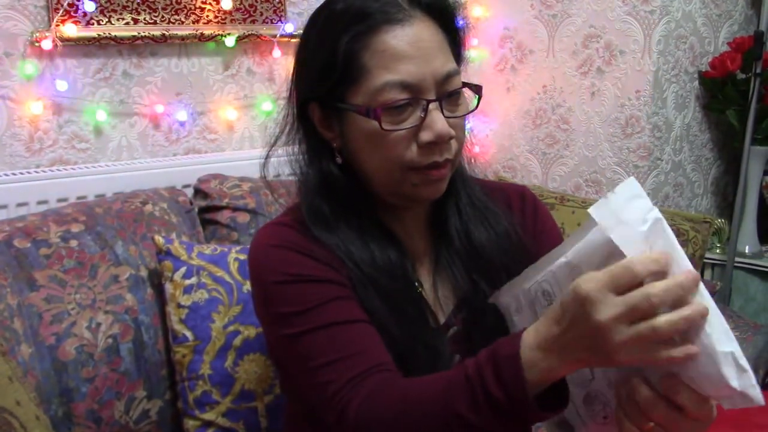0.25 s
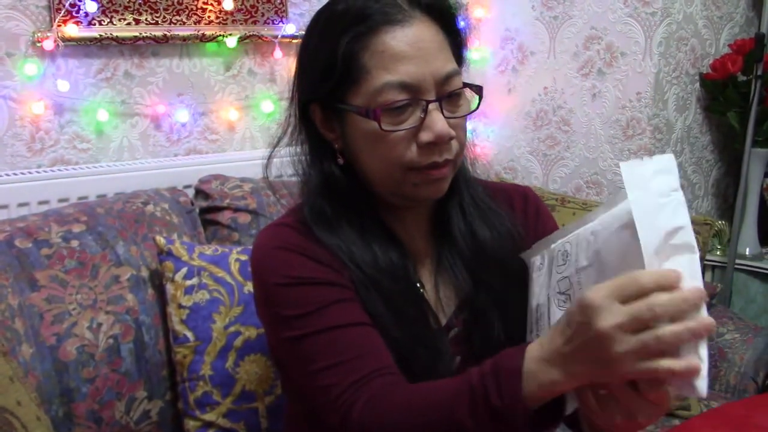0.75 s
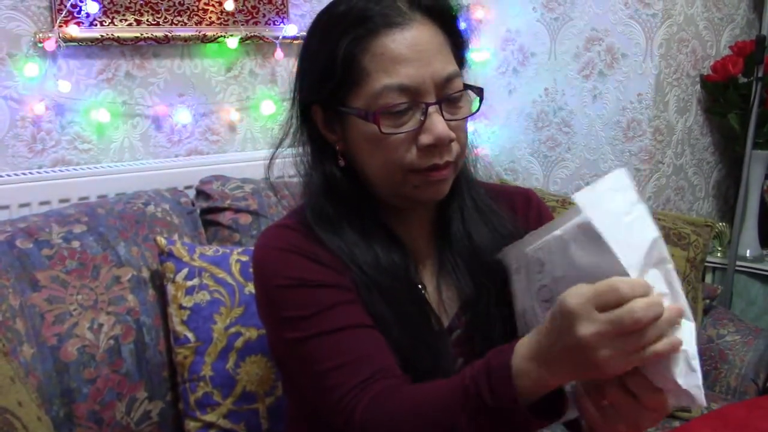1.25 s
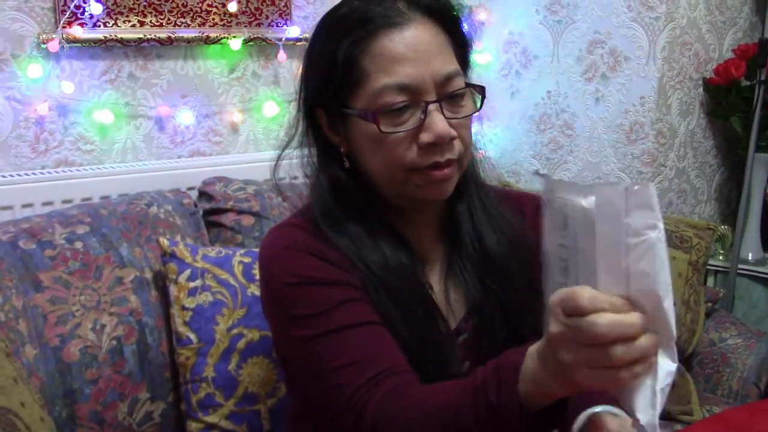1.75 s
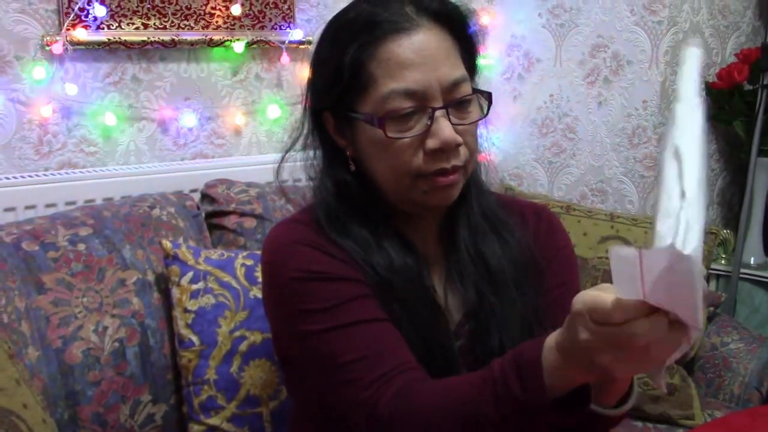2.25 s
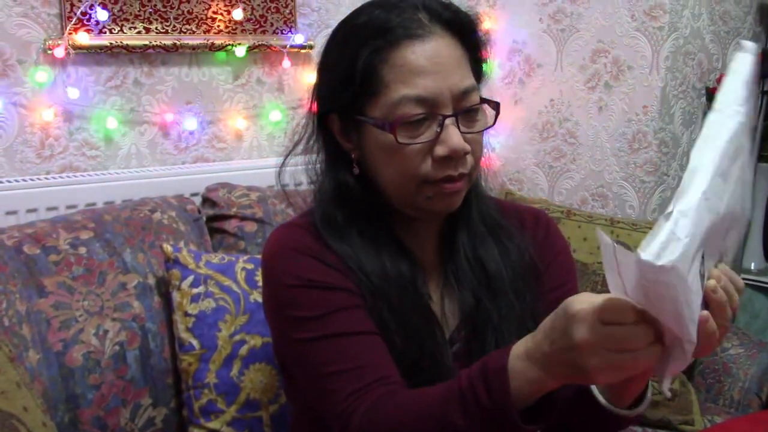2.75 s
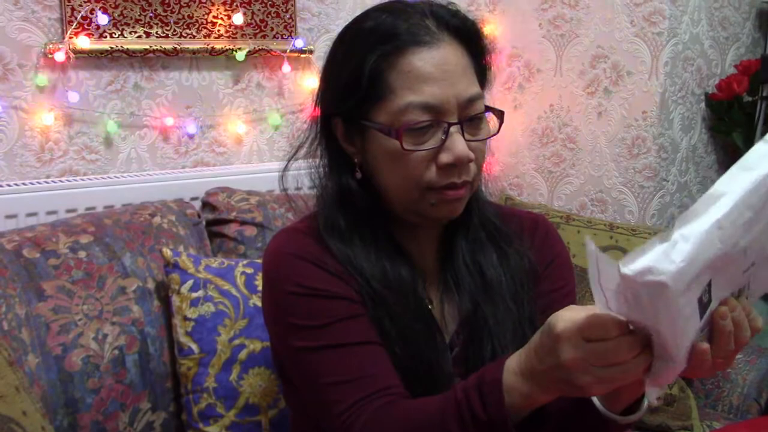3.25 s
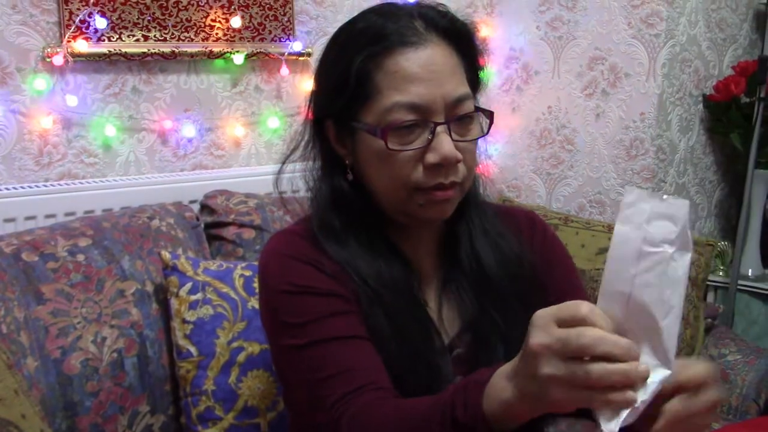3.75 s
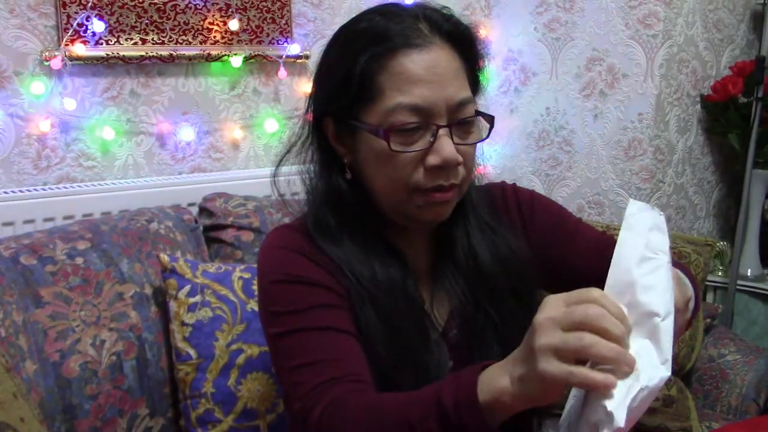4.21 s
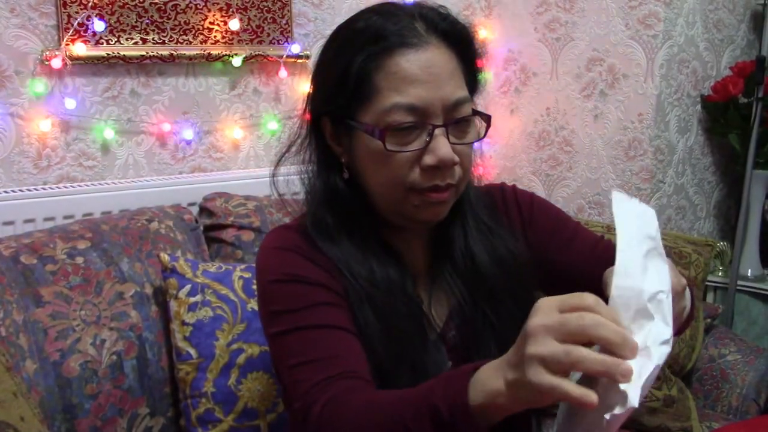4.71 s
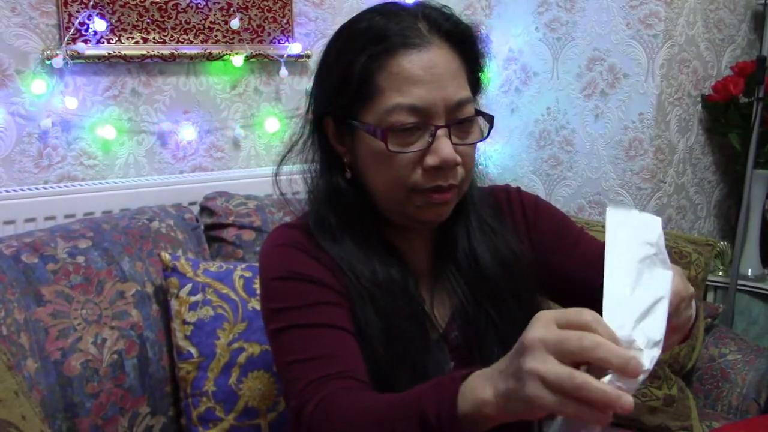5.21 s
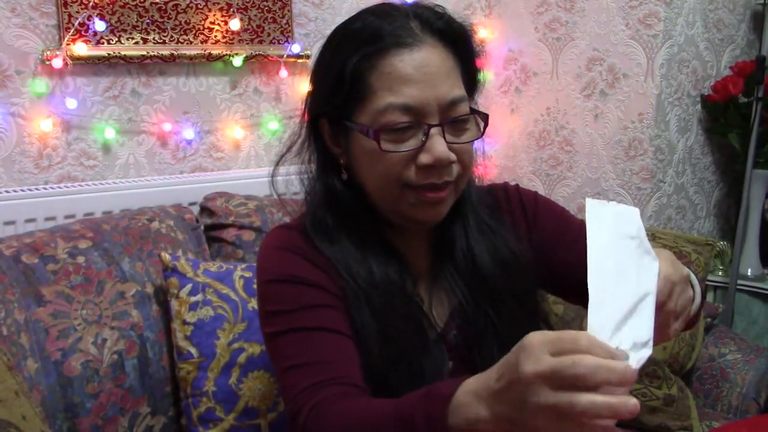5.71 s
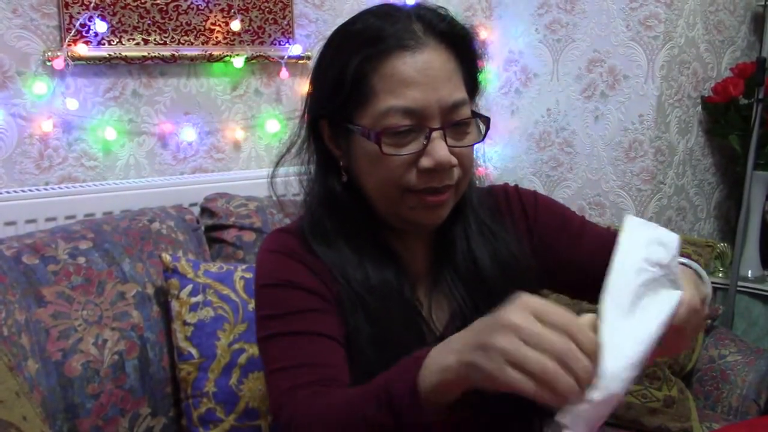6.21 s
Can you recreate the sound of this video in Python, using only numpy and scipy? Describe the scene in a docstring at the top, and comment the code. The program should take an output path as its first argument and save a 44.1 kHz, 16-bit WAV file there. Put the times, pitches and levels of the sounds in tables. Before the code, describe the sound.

Hands turn, bend and tug at a stiff paper envelope in a small soft room, dry crackles growing into sharp ripping bursts.

```python
"""A paper mailing envelope is turned, bent and pulled open by hand: swarms of tiny creases crinkle as filtered
noise grains, bigger ones buckle as single ringing snaps, hard tugs crumple and rip the flap in swelling
avalanches, and the pouch thumps dully as a decaying sine. Place: a small, soft living room with a short tail.
Distance: a metre. Microphone: a camera's close pair, with faint air noise and low rumble behind the paper."""
import sys
import numpy as np
from scipy import signal
from scipy.fft import rfft, irfft, next_fast_len
from scipy.io import wavfile
from scipy.ndimage import uniform_filter1d

SR = 44100
rng = np.random.default_rng(int(sys.argv[2]) if len(sys.argv) > 2 else 0)


def master(y):
    """Save y as 16-bit WAV."""
    cut = np.clip(np.atleast_2d(y).T, -1, 1)
    pcm = np.round(cut * 32767)  # scale
    wavfile.write(sys.argv[1], SR, pcm.astype(np.int16))


N = 285327
TIME = np.arange(N) / SR  # s
SHORT_TIME = TIME[:SR // 60]  # s, long enough for one snap or fold


def undb(db):
    """Decibels to gain."""
    return 10 ** (np.asarray(db) / 20)


def unit(x):
    """Scale to an rms of one."""
    return x / np.sqrt(np.mean(x ** 2) + 1e-20)


def at(points, hz):
    """Read (Hz, value) points on a log-frequency axis."""
    point_hz, value = np.transpose(points)
    return np.interp(np.log(np.maximum(hz, 1)), np.log(point_hz), value)


def band(x, low_hz, high_hz, order=2):
    """Causal band-pass."""
    edges = np.clip([low_hz, max(high_hz, low_hz * 1.05)], 10, [SR * .45, SR * .49])
    return signal.lfilter(*signal.butter(order, edges, "bandpass", fs=SR), x)


def colour(x, points):
    """Give a sound a smooth spectrum, read from (Hz, dB) points."""
    size = next_fast_len(len(x))
    gain = undb(at(points, np.fft.rfftfreq(size, 1 / SR)))
    return irfft(rfft(x, size) * gain, size)[:len(x)]


def add(out, sound, start_s):
    """Mix a sound in at a time."""
    start = int(max(start_s, 0) * SR)
    out[start:start + len(sound)] += sound[:max(N - start, 0)]


# spectrum of the steady air noise: freq_hz [Hz], level_db [dB per Hz]
AIR_SPECTRUM = [(15, -52), (25, -6), (394, 0), (988, 4), (2550, -22), (3340, -28), (5140, -17), (8830, -14),
                (16000, -25)]
AIR_DB = -56.5  # dB


def air_noise():
    """Steady background: white noise given the colour of the air."""
    return undb(AIR_DB) * unit(colour(rng.standard_normal(N), AIR_SPECTRUM))


def room_rumble():
    """The room's low rumble: steady band-passed noise."""
    return undb(-64) * unit(band(rng.standard_normal(N), 45, 530, order=1))


DRAUGHT_DB = -56.5  # dB re the flexing level


def draught(flex_db):
    """A faint low flutter: deep noise that swells as the pouch is flexed."""
    return undb(flex_db + DRAUGHT_DB) * unit(band(rng.standard_normal(N), 12, 54))


# how long each pitch lingers in the room: freq_hz [Hz], t60_s [s]
REVERB_TIMES = [(150, 0.42), (530, 0.19), (1400, 0.2), (3700, 0.21), (10000, 0.18)]
BUILD_S = .0025  # s, build-up of the reflections


def tail():
    """One set of reflections: it builds up within milliseconds, and each band of noise dies at its own pace."""
    t = TIME[:SR // 3]
    edges = np.geomspace(60, 18000, num=9)
    rays = 0
    for low, high in zip(edges, edges[1:]):
        t60_s = at(REVERB_TIMES, np.sqrt(low * high))
        rays = rays + band(rng.standard_normal(len(t)), low, high) * np.exp(-np.log(1000) * t / t60_s)
    return unit(rays * (1 - np.exp(-(t / BUILD_S) ** 2))) / np.sqrt(len(t))


# lingering resonances of the room: pitch_hz [Hz], width_hz [Hz], level_db [dB]
RESONANCES = [(378, 23, -6), (566, 126, -0.5), (830, 105, -7), (1226, 34, -4), (2780, 430, -12)]


def room(x, tail_db=-5.5, count=6):
    """Direct sound, a short soft tail and some lingering resonances."""
    wet = 0
    for k in range(count):
        # the sheet keeps turning, so it lights up one set of reflections after another, ten a second
        turn = (TIME * 10 - k + count / 2) % count - count / 2
        lit = np.cos(np.pi / 2 * np.clip(turn, -1, 1))
        wet = wet + signal.fftconvolve(x * lit, tail())[:N]
    soft_tail = colour(wet, [(200, -1.0), (2500, -1.0), (5000, -2), (12000, -5.5)])
    y = x + undb(tail_db) * soft_tail
    ringing = sum(undb(db) * band(y, hz - width / 2, hz + width / 2, order=1) for hz, width, db in RESONANCES)
    return y + ringing


# difference between the two capsules: freq_hz [Hz], side_db [dB re mid]
CAPSULE_DIFFERENCE = [(150, -35.5), (600, -31.5), (1200, -41.5), (2500, -19.5), (4500, -19), (12000, -23)]


def capsule_side(paper):
    """A few milliseconds of decaying scatter set the close capsules apart, mostly in the treble."""
    t = TIME[:SR // 80]
    scatter = unit(rng.standard_normal(len(t)) * np.exp(-t / 0.0016)) / np.sqrt(len(t))
    return colour(signal.fftconvolve(paper, scatter)[:N], CAPSULE_DIFFERENCE)


# dull bumps of the pouch: start_s [s], level_db [dB], pitch_hz [Hz]
POUCH_BUMPS = [(2.542, -29, 290), (5.147, -26.5, 355)]


def bumps(cycles=2.3):
    """A finger or a popping panel bumps the air in the pouch: a sine that dies within a few cycles."""
    out = np.zeros(N)
    for start_s, db, hz in POUCH_BUMPS:
        turns = np.maximum(TIME - start_s, 0) * hz
        out += undb(db) * np.sin(2 * np.pi * turns) * np.exp(-turns / cycles) * (1 - np.exp(-2 * turns))
    return out


GRAIN_S = .00045  # s, decay of the power of one tiny buckle
RUB = .07  # power of sliding fibres re the mean power of the buckles


def swarm(rate, spread_db, patchy_db, even_s):
    """Tiny buckles at random moments, each with its own colour, over sliding fibres; yields (Hz, steady band)."""
    # rate is in buckles per second
    size = (rng.random(N) < rate / SR) * undb(spread_db * np.minimum(rng.exponential(size=N), 4.5))
    keep = np.exp(-1 / (GRAIN_S * SR))
    edges = np.geomspace(70, 17500, num=13)
    for low, high in zip(edges, edges[1:]):
        strikes = (size * undb(patchy_db * rng.standard_normal(N))) ** 2
        power = signal.lfilter([1], [1, -keep], strikes)
        envelope = np.sqrt(power / power.mean() + RUB)
        grains = band(rng.standard_normal(N) * envelope, low, high, order=3)
        # even out each band's level over even_s, so that the loudness follows the curve applied later
        span = int(even_s * SR)
        local_power = uniform_filter1d(uniform_filter1d(grains ** 2, span), span)
        steady = grains / np.sqrt(np.abs(local_power) + 1e-12)
        yield np.sqrt(low * high), steady * np.sqrt((high - low) / SR)


# spectrum of crumpling paper, for tugs and crinkle alike: freq_hz [Hz], level_db [dB per Hz]
PAPER_SPECTRUM = [(35, -60), (60, -31.5), (227, -8), (363, 0), (458, -3.5), (540, -3.5), (749, -2),
                  (842, -2), (924, -4), (1200, -3), (2520, -2), (4750, -6.5), (7750, -8), (14600, -24),
                  (16000, -34)]
# hard tugs that crumple and rip the flap: peak_s [s], level_db [dB], rise_s [s], fall_s [s]
FLAP_TUGS = [(0.429, -28, 0.043, 0.0071), (1.354, -22.5, 0.0056, 0.0063), (4.11, -20.5, 0.0065, 0.02),
             (4.344, -12, 0.017, 0.0058), (4.842, -20, 0.025, 0.013), (5.878, -11, 0.0096, 0.014)]


def tugs():
    """Each tug sets off an avalanche of buckles and breaking fibres that swells and dies away."""
    swell = 0
    for peak_s, db, rise_s, fall_s in FLAP_TUGS:
        swell = swell + undb(db) * np.exp(np.minimum((TIME - peak_s) / rise_s, (peak_s - TIME) / fall_s))
    fibres = sum(grains for _, grains in swarm(rate=1000, spread_db=8.0, patchy_db=4.5, even_s=0.0044))
    return swell * unit(colour(fibres, PAPER_SPECTRUM))


def facet(hz, ring_s, width, tone):
    """A small panel of paper flips over and rings briefly: band-passed noise plus a sine."""
    t = SHORT_TIME
    ring = np.sqrt(t) * np.exp(-t / ring_s)
    flap = band(rng.standard_normal(len(t)), hz / width, min(hz * width, 4000)) * ring
    return unit(unit(flap) + tone * unit(np.sin(2 * np.pi * hz * t) * ring))


# creases that buckle: start_s [s], level_db [dB], pitch_hz [Hz] of the facet, crack_db [dB re facet]
CREASE_SNAPS = [(0.106, -35, 1920, -25), (0.138, -29, 1970, -8.5), (0.166, -30, 2140, -5),
                (0.215, -31, 2200, 4.5), (0.253, -21, 3180, -5.5), (0.329, -22, 2590, -13),
                (0.376, -26, 2260, -0.5), (0.397, -21.5, 1860, -3), (0.411, -20.5, 1550, -2),
                (0.434, -17, 2390, -4.5), (0.48, -27.5, 1360, -19), (0.621, -24.5, 1080, -13),
                (0.636, -26, 1800, -11.5), (0.693, -30.5, 1890, -20), (0.809, -32.5, 2700, -7),
                (0.828, -33, 2530, -2), (0.838, -28.5, 2700, -7), (0.869, -23.5, 1780, -18),
                (0.903, -27.5, 1320, -30), (0.935, -36, 1260, -32), (0.981, -33, 1760, -33),
                (1.032, -26, 2050, -2.5), (1.065, -29, 1740, -7), (1.118, -27, 3050, -38),
                (1.337, -29, 2530, 0), (1.184, -41, 990, -11), (1.26, -36, 2400, -20),
                (1.503, -37, 2520, -1), (1.56, -30, 2120, -10), (1.621, -20.5, 1420, -5.5),
                (1.705, -28, 1710, -8), (1.858, -45, 1400, -18), (1.908, -32, 1380, -4.5),
                (1.956, -30, 1900, -22), (1.965, -27, 2630, 1.5), (2.021, -34, 2300, -2),
                (2.032, -26, 1530, 0), (2.167, -31, 2760, -23), (2.186, -32, 2400, 1),
                (2.231, -30, 1300, -8), (2.294, -22, 2680, -4.5), (2.323, -25.5, 2540, -2.5),
                (2.402, -28.5, 1340, -9.5), (2.474, -30.5, 2440, -5.5), (2.487, -33.5, 2270, -4),
                (2.527, -30.5, 2840, -3.5), (2.613, -23.5, 2670, -9), (2.647, -30.5, 2000, -4.5),
                (2.697, -34.5, 740, -26), (2.717, -30, 2080, -5), (2.77, -28, 1850, -12),
                (2.821, -23.5, 2900, -4), (2.909, -32, 1250, -13), (2.966, -16.5, 1780, -17),
                (3.058, -33, 1430, -9), (3.07, -32, 1370, -8), (3.127, -29.5, 1510, -30),
                (3.16, -24.5, 1730, -14), (3.217, -31, 1120, -19), (3.331, -22, 1730, -16),
                (3.358, -35.5, 2720, 1), (3.403, -33, 1580, -29), (3.552, -34, 1330, -24),
                (3.568, -35, 1700, -3), (3.603, -33.5, 1860, -2.5), (3.754, -40.5, 1060, -30),
                (3.782, -38, 1530, -25), (3.847, -33, 2980, -18), (3.925, -46, 1510, -21),
                (3.989, -27, 2050, -21), (4.012, -23, 1550, -13), (4.098, -24.5, 1980, 2),
                (4.224, -25.5, 2500, -6), (4.287, -27, 1260, -19), (4.304, -26, 2930, 3),
                (4.33, -20.5, 1730, -16), (4.698, -23, 1400, -13), (4.807, -26.5, 1380, -11),
                (4.837, -15.5, 2070, -14), (4.844, -23.5, 2360, 0), (4.929, -29.5, 1610, -5),
                (4.942, -28, 1870, -6.5), (5.0, -28, 1900, -7), (5.223, -26.5, 1820, -7.5),
                (5.228, -27, 1000, -21), (5.255, -21.5, 1950, -14), (5.277, -27.5, 1410, -28),
                (5.374, -34, 1590, -30), (5.492, -33, 3100, -1), (5.656, -23, 1580, -21),
                (5.685, -22, 1670, -16), (5.757, -26, 2010, -2), (5.87, -19.5, 1890, -4),
                (5.882, -19.5, 1580, -1), (5.888, -29, 2580, 7), (6.248, -38, 1120, -5),
                (6.311, -25, 1900, -7)]
CRACK_S = .00062  # s, decay of a cracking crease
KNOCK_DB, KNOCK_DB_PER_OCTAVE = -14, -8  # pouch knock re the facet; lower facets shake it more
MIDDLING_HZ = 2000  # Hz, facet pitch at which the knock has KNOCK_DB
RING_CYCLES = 1.87  # decay of a facet in cycles, so small ones are over sooner


def snaps(body_s=0.00081, tick_s=0.00012):
    """A big facet flips: it rings, its crease cracks with a sharp tick, and the pouch behind gives a knock."""
    out, t = np.zeros(N), SHORT_TIME
    split, knock, tick = (np.sqrt(t) * np.exp(-t / fade_s) for fade_s in (CRACK_S, body_s, tick_s))
    for start_s, db, hz, crack_db in CREASE_SNAPS:
        crack_noise, tick_noise, body_noise = rng.standard_normal((3, len(t)))
        crack = unit(band(crack_noise, 5470, 8220) * split)
        crack = crack + undb(-7.0) * unit(band(tick_noise, 3100, 7900) * tick)
        body = unit(band(body_noise * knock, 416, 904))
        body_db = KNOCK_DB + KNOCK_DB_PER_OCTAVE * np.log2(hz / MIDDLING_HZ)
        ring = facet(hz, RING_CYCLES / hz, width=1.64, tone=0.46)
        snap = ring + undb(crack_db) * crack + undb(body_db) * body
        add(out, snap * undb(db), start_s - .0002)
    return band(out, 260, 25000, order=3)


FOLD_DB = -14.5  # dB, small folds re the crinkle
FOLD_LIMIT_DB = -20.5  # dB, vigour beyond which they grow no louder


def folds(vigour_db, count=220, spread_db=4, crack_db=-9):
    """Small facets tick at random, louder with vigorous handling up to a limit; higher ones crack more."""
    out, t = np.zeros(N), SHORT_TIME
    # when, pitch and size each run from 0 to 1
    for when, pitch, size in rng.random((count, 3)):
        db = FOLD_DB + min(vigour_db[int(when * N)], FOLD_LIMIT_DB) + spread_db * (2 * size - 1)
        crack = unit(band(rng.standard_normal(len(t)), 4400, 8300) * np.exp(-t / CRACK_S))
        ring = facet(1000 * 3.3 ** pitch, ring_s=0.0013, width=1.67, tone=0.63)
        fold = ring + pitch * undb(crack_db) * crack
        add(out, fold * undb(db), when * TIME[-1])
    return band(out, 230, 19000)


ATTACK_S, RELEASE_S = 0.0045, 0.011  # s, how fast crinkling sets in and settles


def movement(start_s, end_s):
    """Power of one hand movement: it rises up to the start, holds, and falls away after the end."""
    rise, fall = (TIME - start_s) / ATTACK_S, (end_s - TIME) / RELEASE_S
    return np.exp(2 * np.minimum(np.minimum(rise, fall), 0))


REST_DB = -44.5  # dB, the envelope merely held
# spells in which the sheet is kept moving and rustles: start_s [s], end_s [s], level_db [dB]
RUSTLE_SPELLS = [(0.094, 0.504, -28.5), (0.573, 0.647, -30), (0.695, 0.863, -25.5), (0.921, 1.146, -30.5),
                 (1.26, 1.448, -24), (1.485, 1.715, -29), (1.883, 2.92, -27), (3.06, 3.716, -33),
                 (3.747, 3.799, -30.5), (3.935, 4.533, -32), (4.577, 5.013, -25.5), (5.061, 6, -28.5),
                 (6.022, 6.114, -29.5), (6.251, 6.47, -22)]
# bends, each a short burst of crinkling: start_s [s], length_s [s], level_db [dB],
# fine_db [dB re level_db] sizzle of fine creases, flex_db [dB re level_db] flexing of the pouch
SHEET_BENDS = [(0.0, 0.016, -13.5, -5, -1), (0.161, 0.063, -12.5, -5.5, -5), (0.331, 0.17, -15, 0.5, -8),
               (0.614, 0.017, -17, -3.5, 3), (0.808, 0.051, -21, -4, -13), (1.03, 0.07, -27, -5, 5),
               (1.182, 0.01, -29, -2, 11), (1.274, 0.065, -24, 0, -19), (1.504, 0.034, -21, -11, -3),
               (1.663, 0.053, -17.5, -1, -6), (1.966, 0.14, -18.5, -15, -0.5), (2.18, 0.09, -22, -1, -1),
               (2.307, 0.024, -13.5, 2.5, -3), (2.607, 0.06, -23, -3, 1), (2.764, 0.025, -21.5, -3, 1.5),
               (2.824, 0.032, -23.5, -1, -10), (2.968, 0.044, -24, -15, 5),
               (3.057, 0.0093, -18.5, -3.5, -7), (3.166, 0.017, -21.5, -15, 3), (3.326, 0.026, -20, 2, 2),
               (3.553, 0.071, -28.5, -2, 0), (3.653, 0.032, -32, 6.5, 2), (3.962, 0.18, -13.5, -3, -3.5),
               (4.19, 0.043, -14, 3, -6), (4.296, 0.054, -8.5, 0.5, -5.5), (4.458, 0.025, -22, 3, -3),
               (4.591, 0.065, -22, 0, 3.5), (4.693, 0.013, -20, -1, 14.5), (4.804, 0.054, -17, 6, -1),
               (4.918, 0.05, -18.5, -1, -1), (4.988, 0.012, -12, 3.5, -5.5), (5.095, 0.03, -22.5, 3, -9),
               (5.239, 0.058, -17, -1.5, -5.5), (5.328, 0.1, -31.5, 7.5, -14), (5.487, 0.06, -23, -2, -0.5),
               (5.622, 0.055, -19.5, 4.5, 0), (5.788, 0.047, -20.5, 2.5, 5.5),
               (5.875, 0.068, -13.5, -7, -3), (6.307, 0.039, -14, 4.5, 6.5), (6.406, 0.024, -11.5, 4, -1.5)]


def handling(sizzle_db=-0.2, flexing_db=-0.3):
    """Rustling spells and single bends add up in power; gives dB of crinkle, sizzle and flexing over time."""
    rustle = undb(REST_DB) ** 2
    rustle = rustle + sum(undb(db) ** 2 * movement(start_s, end_s) for start_s, end_s, db in RUSTLE_SPELLS)
    power = np.outer(undb([0, sizzle_db, flexing_db]) ** 2, rustle)
    for start_s, length_s, db, fine_db, flex_db in SHEET_BENDS:
        levels = undb([db, db + fine_db, db + flex_db]) ** 2
        power += np.outer(levels, movement(start_s, start_s + length_s))
    return 10 * np.log10(power)


def crinkle(mid_db, fine_db, flex_db):
    """The sheet creases as it is handled: broad flexing sounds low, fine creases sizzle."""
    out = 0
    for hz, grains in swarm(rate=620, spread_db=3.5, patchy_db=5.5, even_s=0.018):
        # share of flexing and of fine creases in this band
        flex = at([(450, 1.0), (800, 0.019)], hz)
        fine = at([(3200, 0.15), (6000, 1.0)], hz)
        out = out + grains * undb(flex * flex_db + fine * fine_db + (1 - flex - fine) * mid_db)
    return colour(out, PAPER_SPECTRUM)


def scene():
    """The paper in its room over air noise; scattered treble and low rumble differ between the capsules."""
    mid_db, fine_db, flex_db = handling()
    envelope = crinkle(mid_db, fine_db, flex_db) + folds(mid_db) + tugs() + snaps() + bumps()
    paper = room(envelope)
    mid = paper + air_noise() + draught(flex_db)
    side = capsule_side(paper) + room_rumble()
    return mid + side * np.array([[1], [-1]])


TOP_HZ = 15900  # Hz, upper limit of the camera's sound


def record(dry):
    """The camera rounds the loudest peaks and cuts the top."""
    rounded = dry / (1 + (dry / .92) ** 4) ** .25
    return signal.sosfilt(signal.ellip(10, .2, 80, TOP_HZ, fs=SR, output="sos"), rounded)


dry = scene()
out = record(dry)
master(out)
```